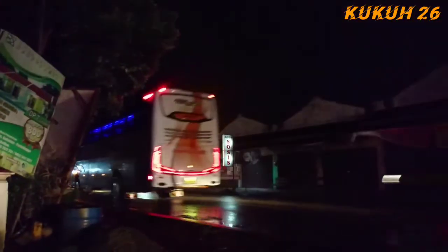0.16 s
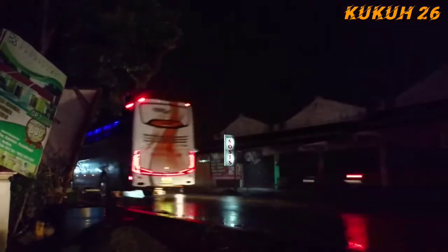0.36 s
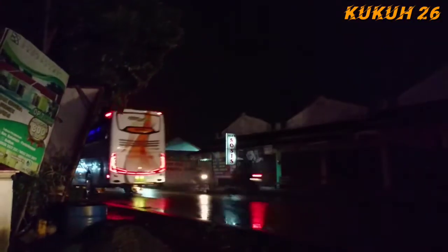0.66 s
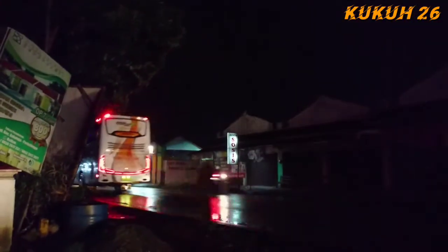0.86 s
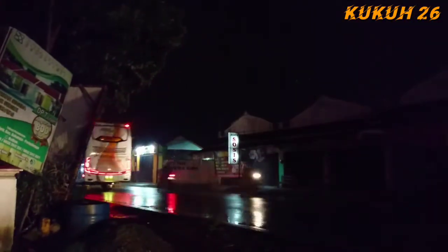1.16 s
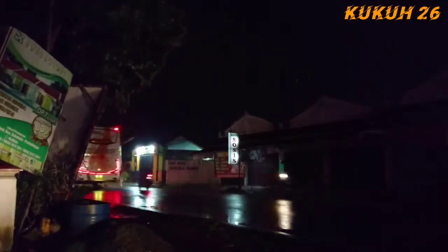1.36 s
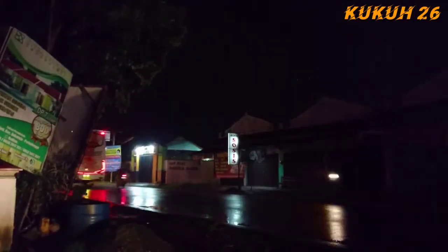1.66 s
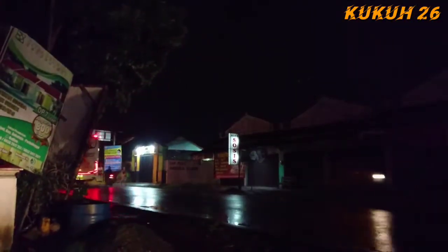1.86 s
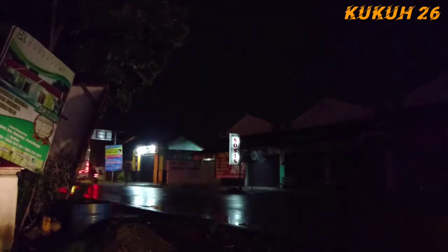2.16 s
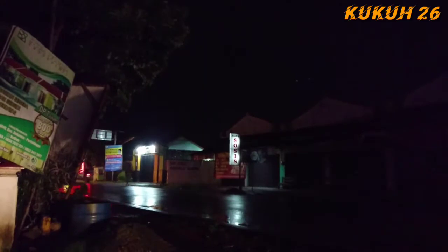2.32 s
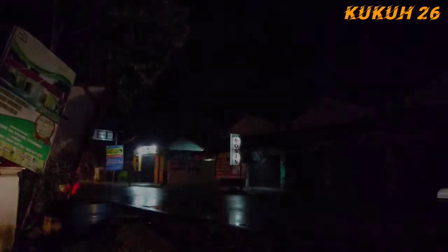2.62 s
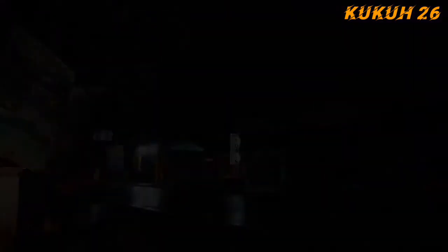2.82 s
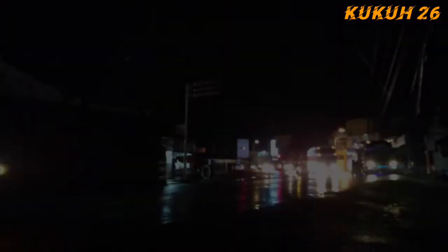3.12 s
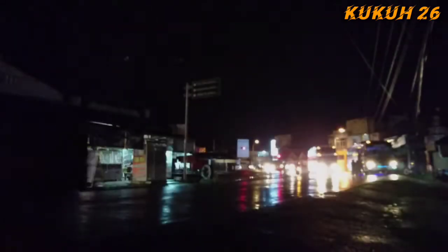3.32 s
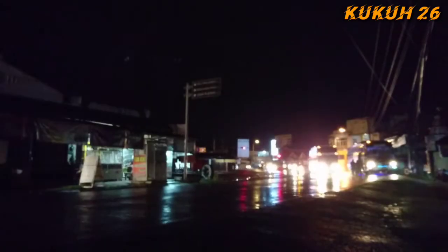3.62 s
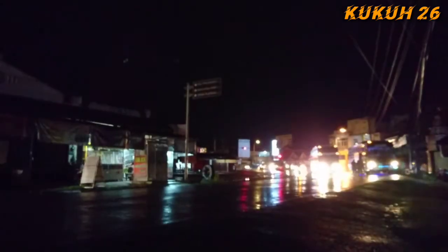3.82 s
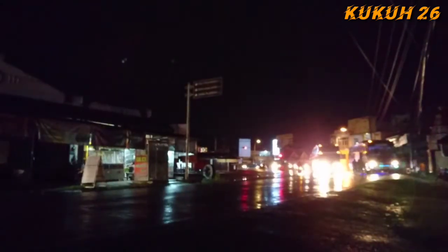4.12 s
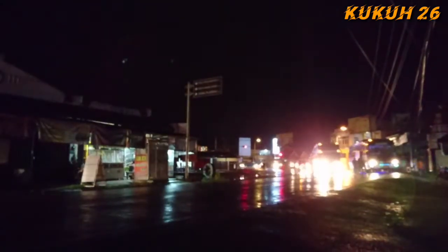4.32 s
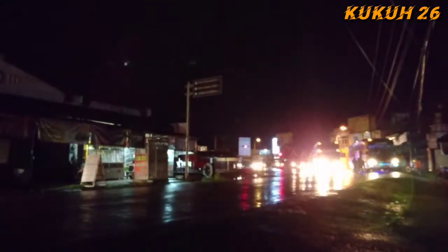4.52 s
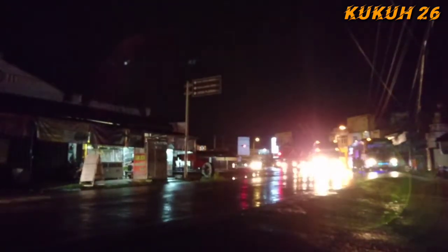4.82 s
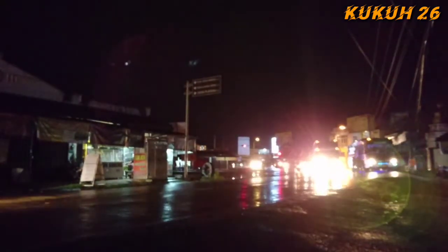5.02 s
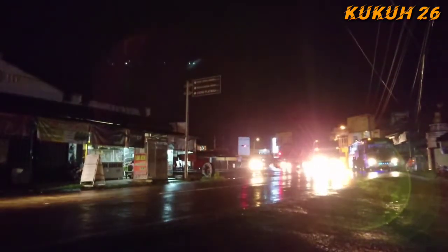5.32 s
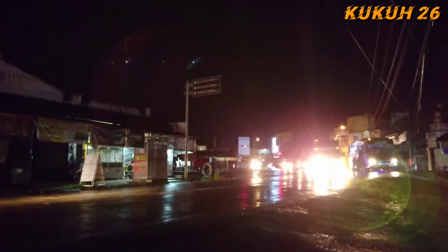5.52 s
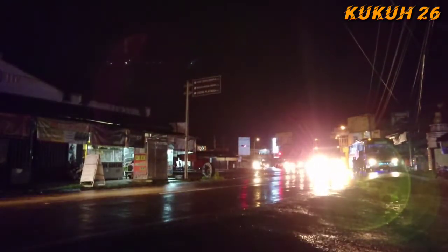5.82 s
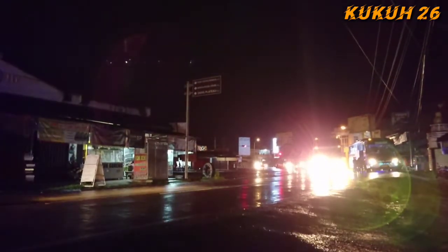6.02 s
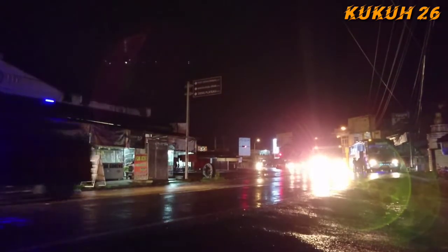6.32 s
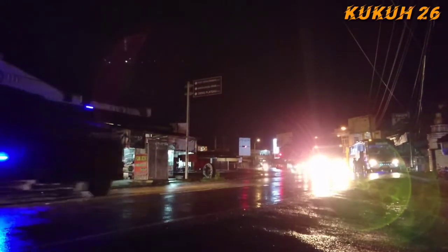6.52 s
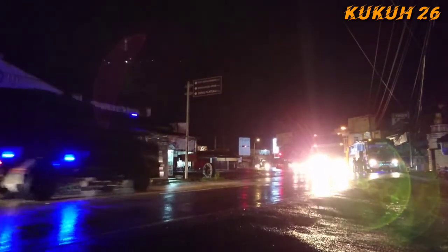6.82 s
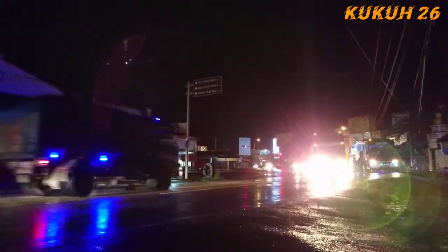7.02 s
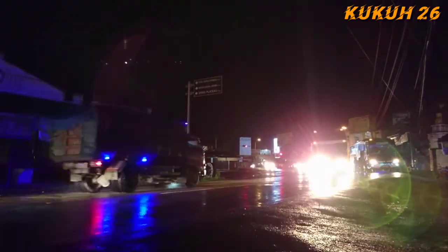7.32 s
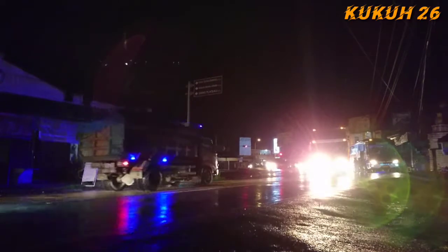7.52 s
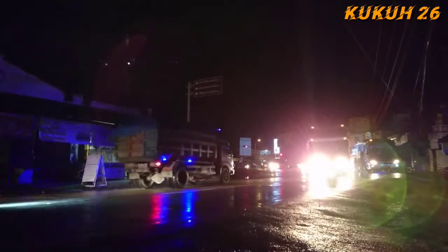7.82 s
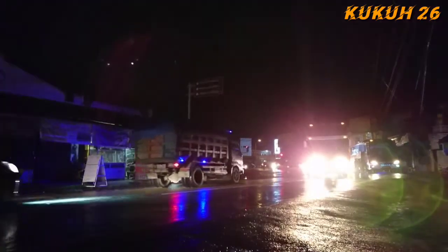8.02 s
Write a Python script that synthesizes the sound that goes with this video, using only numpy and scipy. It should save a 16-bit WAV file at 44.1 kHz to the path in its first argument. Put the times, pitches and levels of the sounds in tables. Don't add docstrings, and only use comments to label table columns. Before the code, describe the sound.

Night roadside on a wet street, phone microphone. From 0 s a nearby diesel coach pulls away, its hoarse intake howl near 900 Hz swelling around 0.15, 0.45 and 1 s over roar, injector clatter and fan hiss; it drops behind cover by about 1.2-1.7 s. A farther coach's buzzing exhaust growl strengthens from 0.6 s and climbs steadily to 2.4 s, then lifts off, with distant hums, wet tyre spray and a faint rising scooter whine. All fades from 2.45 to 3.05 s. Silence until 3.9 s, then abruptly a broad wet-road wash of slowing vehicles, treads singing thinly. Low lorry pulses slow in pitch, strongest near 4.5 and 5.1 s; hollow load bed booms build from 4.9 to 6.1 s. Splashes swell around 6-7 s, then faint idles and softening road hiss until 8.2 s. The left is dull first, almost silent later.

```python
import sys
import numpy as np
from scipy import signal
from scipy.fft import rfft, irfft, next_fast_len
from scipy.io import wavfile
from scipy.ndimage import uniform_filter1d

SR = 44100
rng = np.random.default_rng(int(sys.argv[2]) if len(sys.argv) > 2 else 0)


def elevation(decibels):
    levels = np.asarray(decibels, float)
    return 10 ** (levels / 20)


def int16_out(signal):
    q = np.round(np.clip(np.atleast_2d(signal).T, -1, 1) * 32767)
    wavfile.write(sys.argv[1], SR, q.astype(np.int16))


N = 360297
LONG = next_fast_len(N)
TIME, FREQ = np.arange(N) / SR, np.fft.rfftfreq(LONG, 1 / SR)


def columns(table):
    times, *values = np.transpose(table)
    return [np.interp(TIME, times, value) for value in values]


def over_hz(table):
    hz, value = np.transpose(table)
    return np.interp(np.log(FREQ + 1), np.log(hz), value)


def span(table, edge_s=0.099):
    inside_s = np.minimum(TIME - table[0][0], table[-1][0] - TIME)
    return np.clip(inside_s / edge_s + 1, 0, 1)


def bell(at_s, width_s):
    return np.exp(-((TIME - at_s) / width_s) ** 2)


def glides(rows):
    return [[(s, a_hz, db), (s + length, b_hz, db)] for s, length, a_hz, b_hz, db in rows]


def wave(spectrum):
    return irfft(spectrum, LONG)[..., :N]


def walk(rate):
    x = wave(rfft(rng.standard_normal(LONG)) * np.exp(-(FREQ / rate) ** 2))
    return x / x.std()


def tone(hz, db, rough, width_hz):
    wander = walk(width_hz) + 1j * walk(width_hz)
    waver = np.sqrt(1 - rough) + np.sqrt(rough / 2) * wander
    turning = np.exp(2j * np.pi * np.cumsum(hz) / SR)
    return np.sqrt(2) * elevation(db) * np.real(waver * turning)


def orders(table, multiples, roughs):
    hz, *order_db = columns(table)
    lines = sum(tone(k * hz, db, rough, 6) for k, db, rough in zip(multiples, order_db, roughs))
    return span(table, .12) * lines


def knock(hz, depth):
    gain = np.exp(depth * np.cos(2 * np.pi * np.cumsum(hz) / SR))
    return gain / np.sqrt(np.mean(gain ** 2))


def ports(x, other, left_db, lead, like):
    ratio = elevation(left_db)
    balance = 2 / np.sqrt(1 + ratio ** 2 + 2 * ratio * like)
    mixed = like * x + np.sqrt(1 - like ** 2) * other
    left = mixed * ratio * np.exp(1j * lead * np.arctan(FREQ / 90))
    return np.array([left, x]) * balance


# (frequency [Hz], correlation [-1 to 1])
PORT_LIKENESS = [(60, 0.77), (250, 0.96), (600, 0.5), (900, 0.75), (1300, -0.2), (1800, -0.14),
                 (2150, -0.43), (2500, 0.72), (3300, .02)]
# (frequency [Hz], width [Hz], level [dB])
PORT_PEAKS = [(1217, 69, -2.5), (1970, 100, 2), (2640, 170, 2), (3174, 580, -3.5), (4000, 150, 0),
              (4580, 350, 0.5), (6100, 500, -1), (7500, 600, 3.5), (12640, 540, -3), (14270, 1200, 0),
              (20, 28, -6)]


def wash(colour, left_db, lead, edges_hz, levels_db, flicker_db, rate):
    a, b = rfft(rng.standard_normal((2, LONG)))
    peaks_db = sum(db * np.exp(-((FREQ - hz) / width) ** 2) for hz, width, db in PORT_PEAKS)
    like = np.clip(over_hz(PORT_LIKENESS), -.99, .99)
    both = ports(a, b, left_db, lead, like) * elevation(over_hz(colour) + peaks_db)
    steps = [1] + [1 / (1 + (hz / (FREQ + 1)) ** 8) for hz in edges_hz[1:]] + [0]
    bands = []
    for k, db in enumerate(levels_db):
        part = both * (steps[k] - steps[k + 1])
        middle = part.mean(axis=0)[FREQ > edges_hz[0]]
        rms = np.sqrt(2 * np.sum(abs(middle) ** 2)) / LONG
        bands.append(wave(part) / rms * elevation(db + flicker_db * walk(rate)))
    return bands


def exhaust(table, order_db, rough, width_hz):
    hz = columns(table)[0]
    lines = sum(tone(k * hz, db, min(rough * k, 1), width_hz) for k, db in enumerate(order_db, 1))
    growl_db = np.max(order_db, axis=0) - 22
    for j, k in enumerate(range(len(order_db) + 1, 11)):
        lines = lines + tone(k * hz, growl_db - 2.3 * j, 0.49, 12)
    left = elevation(np.interp(TIME, (0.98, 1.2), (-1.5, -11.5)))
    return span(table) * lines * np.array([left, np.ones(N)]) * 2 / (1 + left)


# (time [s], half firing rate [Hz], firing level [dB])
FAR_COACH = [
    (0, 60.6, -35),
    (.4, 61.25, -32),
    (.6, 62.6, -23),
    (1.05, 66.8, -20.5),
    (1.65, 72.5, -22),
    (1.95, 76.1, -19),
    (2.4, 81.3, -20),
    (2.55, 81.05, -38),
    (3.04, 78.6, -48),
]


def far_coach():
    hz, db = columns(FAR_COACH)
    loudest_half_db, shut_half_db = -27, -61
    half_db = np.clip(loudest_half_db - 10.5 * (71.1 - hz), shut_half_db, loudest_half_db)
    order_db = [half_db, db]
    pipe_hz, pipe_width_hz, pipe_db = 285, 21, 6.5
    for k, under_db in ((3, -13), (4, -16)):
        lift_db = pipe_db * np.exp(-((k * hz - pipe_hz) / pipe_width_hz) ** 2)
        order_db.append(db + under_db + lift_db)
    ninth = tone(9 * hz, db - 17, .3, 8.8) * np.exp(-((9 * hz - 687) / 40) ** 2)
    return exhaust(FAR_COACH, order_db, .015, 6) + ninth


# (time [s], firing rate [Hz], firing level [dB])
NEAR_COACH = [
    (0, 103.9, -22),
    (.3, 106.2, -24.5),
    (.7, 113.1, -26.5),
    (1, 116.8, -22.5),
    (1.2, 118.2, -32),
    (1.4, 116.4, -49),
]


def near_coach():
    db = columns(NEAR_COACH)[1]
    return exhaust(NEAR_COACH, [db, db - 9], .03, 6)


# (time [s], pitch [Hz], level [dB])
HOWL = [
    (0, 900, -20),
    (.15, 920, -14),
    (.28, 938, -23.5),
    (.45, 928, -10.5),
    (.7, 919, -15),
    (.84, 937.7, -25),
    (1.0, 947.5, -17.5),
    (1.3, 919, -23),
    (1.68, 813, -38),
]
# (frequency [Hz], level [dB per Hz])
ENGINE_COLOUR = [(18, -59), (30, -38.5), (111, -9.5), (164, -23.5), (370, -7.5), (750, -5), (924, -4.5),
                 (1110, -8.5), (2630, -10.5), (7300, -25), (10000, -37), (15600, -24)]
# (frequency [Hz], level [dB])
DULL_LEFT = [(60, -11), (250, -5), (600, -3.5), (900, -4), (1800, -4.5), (2500, -7.5), (3500, -1.5),
             (4500, -6), (6000, -1), (6800, -10), (7050, -70.5), (8200, -68), (8500, -15), (14000, -22.5)]
# (level [dB], loss with distance [dB/s], cover reached [s], loss behind cover [dB/s])
ENGINE_LAYERS = [
    (-14.5, 3.5, 1.636, 120),
    (-17, 1.66, 1.183, 49),
    (-31.5, 3, 1.13, 71),
]


def near_engine_bay():
    howl_hz, howl_db = columns(HOWL)
    howl_hz = howl_hz * (1 + .016 * walk(6))
    levels_db = []
    for db, away, cover_s, hidden in ENGINE_LAYERS:
        levels_db.append(db - away * TIME - hidden * np.maximum(TIME - cover_s, 0))
    levels_db[0] = levels_db[0] - 3
    edges_hz = (150, 1200, 8500)
    roar, clatter, fan = wash(ENGINE_COLOUR, over_hz(DULL_LEFT), .2, edges_hz, levels_db, 0.86, 7.2)
    clatter = knock(columns(NEAR_COACH)[0], 0.058) * clatter
    shared = tone(howl_hz, howl_db, 0.8, 60)
    howl = [0.58 * shared + 0.67 * tone(howl_hz, howl_db, 0.95, 62) for _ in range(2)]
    return span(HOWL, 0.1) * np.array(howl) + roar + clatter + fan


# (time [s], firing rate [Hz], firing level [dB])
LORRY_REVS = [
    (3.9, 59.4, -46),
    (4.2, 59.3, -40),
    (4.47, 57.5, -27.5),
    (4.75, 56.6, -36.5),
    (5.1, 55.93, -29.5),
    (5.4, 53.78, -37),
    (5.8, 50.4, -35),
    (6.1, 48.74, -40),
    (6.6, 45.72, -43),
]
# (time [s], level [dB])
BED_BOOMS = [
    (4.3, -38),
    (4.87, -33),
    (5.12, -29),
    (5.42, -26),
    (5.77, -26),
    (6.099, -27),
    (6.42, -37),
]


def lorry():
    hz, db = columns(LORRY_REVS)
    boom = elevation(-41) + sum(elevation(boom_db) * bell(s, 0.11) for s, boom_db in BED_BOOMS)
    low = tone(hz, db, .03, 6) + tone(2 * hz, -39, .2, 6)
    bed = tone(7 * hz, 0, .4, 18) + tone(8 * hz, -8, .5, 12) + tone(8.1 * hz, -4, 0.81, 37)
    return span(LORRY_REVS, 0.13) * (low + boom * bed)


# (time [s], firing rate [Hz], level [dB])
VAN_REVS = [
    (3.9, 77.8, -34.5),
    (4.35, 76, -38),
    (4.7, 75, -59),
    (6.2, 69.1, -36),
    (6.5, 69, -50),
]


def van():
    table = [(s, hz, db, db - 7.5) for s, hz, db in VAN_REVS]
    return orders(table, (1, 2), (.05, .3))


# (start [s], length [s], first pitch [Hz], last pitch [Hz], level [dB])
IDLING = [
    (6.5, .33, 91, 90.5, -33),
    (7, 1.2, 98, 91, -41),
    (7, 1.2, 63, 59, -39),
    (7.5, .5, 140, 137, -41),
    (7.45, .45, 183, 185, -38),
]


def idlers():
    return sum(orders(table, [1], [.12]) for table in glides(IDLING))


def tread_song(rows, share_db, width_hz):
    song = 0
    for table in glides(rows):
        hz, db = columns(table)
        song = song + span(table, 0.2) * tone(hz, db + share_db, 0.91, width_hz)
    return song


# (start [s], length [s], first pitch [Hz], last pitch [Hz], level [dB])
QUEUE_TREADS = [
    (3.9, 0.303, 1834, 1853, -18),
    (4.6, .8, 1913, 1814, -19),
    (5.6, .6, 1804, 1800, -27),
    (6.45, .2, 1728, 1694, -21),
    (6.75, .3, 1750, 1700, -23),
    (7.1, 1.1, 1711, 1783, -27.5),
    (3.9, 1.6, 2820, 2830, -24),
    (6.6, 1.6, 4750, 4605, -30),
]


def queue_treads():
    return tread_song(QUEUE_TREADS, -10.5, 330)


# (start [s], length [s], first pitch [Hz], last pitch [Hz], level [dB])
SCOOTER_WHINE = [
    (2.35, .35, 2400, 2484, -31),
]


def scooter():
    return tread_song(SCOOTER_WHINE, -4.5, 316)


# (start [s], length [s], first pitch [Hz], last pitch [Hz], level [dB])
STREET_HUMS = [
    (1.9, 1.2, 206, 200, -42),
    (2.4, .7, 55.5, 56.5, -37),
    (1.75, 1.3, 412, 397, -36),
    (2.45, .4, 155, 152, -27),
]


def distant_engines():
    return sum(orders(table, [1], [.4]) for table in glides(STREET_HUMS))


# (frequency [Hz], level [dB per Hz])
STREET_COLOUR = [(18, -52.5), (30, -24), (71, -11.5), (113, -13.5), (158, -7.5), (281, -12.5), (394, -18.5),
                 (485, -15), (552, -13), (1110, -18), (7240, -30), (9150, -45.5), (15000, -39)]
# (level [dB], rise as a vehicle nears [dB])
STREET_LAYERS = [
    (-28.5, 2.5),
    (-27, -1),
    (-35, 7),
    (-64, 18),
]


def street_road(left_db):
    nearness = np.interp(TIME, (1.76, 2.65), (0, 1))
    levels_db = [db + rise * nearness for db, rise in STREET_LAYERS]
    edges_hz = (30, 500, 3000, 11500)
    rumble, tyres, spray, mist = wash(STREET_COLOUR, left_db, 0.058, edges_hz, levels_db, 0.69, 11)
    return rumble + tyres + knock(columns(FAR_COACH)[0], .07) * (spray + mist)


# (time [s], level [dB])
QUEUE_LEVEL = [
    (3.9, 0.3),
    (4.15, .5),
    (4.4, -1),
    (4.8, 0),
    (5.2, -0.5),
    (5.75, -0.5),
    (6.05, -1.5),
    (6.55, -1.5),
    (7.2, -3),
    (8.17, -4.5),
]
# (frequency [Hz], level [dB per Hz])
EARLY_QUEUE_COLOUR = [(18, -35), (30, -24.5), (59, -6.5), (88, -14), (114, -13), (219, -9.5), (380, -4.5),
                      (577, -8.5), (1230, -6.5), (1970, -9), (3600, -13), (7300, -12.5), (9000, -25),
                      (15600, -26)]
# (frequency [Hz], level [dB per Hz])
LATE_QUEUE_COLOUR = [(18, -38), (30, -10), (55, -5.5), (219, -6.5), (300, -1), (468, -6), (577, -11),
                     (877, -6.5), (1270, -10), (1520, -8.5), (2560, -12), (7300, -15.5), (8770, -27.5),
                     (15600, -32.5)]
# (level [dB], share of queue level [ratio], share of splash [ratio])
WET_LAYERS = [
    (-27, 0.61, 0.14),
    (-23.5, 1.64, 0.035),
    (-28, 0.9, 1.24),
    (-53, 0.88, .8),
]
# (time [s], width [s], swell [dB])
PUDDLES = [
    (4.25, 0.14, -0.3),
    (4.78, 0.19, 1),
    (5.72, 0.093, 0),
    (6.1, 0.54, 1),
    (6.35, 0.14, 1.5),
    (6.85, .15, 1.5),
    (7.82, .08, 0.5),
]


def queue_road(left_db):
    splash_db = sum(db * bell(s, width_s) for s, width_s, db in PUDDLES)
    queue_db = columns(QUEUE_LEVEL)[0]
    levels_db = [db + away * queue_db + wet * splash_db for db, away, wet in WET_LAYERS]
    edges_hz = (150, 600, 3000, 11000)
    early = sum(wash(EARLY_QUEUE_COLOUR, left_db, -.9, edges_hz, levels_db, 0.42, 30))
    late = sum(wash(LATE_QUEUE_COLOUR, left_db, -.9, edges_hz, levels_db, 0.42, 30))
    turn = np.interp(TIME, (5.56, 7.26), (0, np.pi / 2))
    return (early * np.cos(turn) + late * np.sin(turn)) * knock(columns(VAN_REVS)[0], 0.072)


def first_take():
    left_db = over_hz(DULL_LEFT) - 3 + 2.5 / (1 + (FREQ / 250) ** 2)
    far = wave(ports(rfft(distant_engines() + scooter(), LONG), 0, left_db, 0.101, 0.84))
    mix = far_coach() + near_coach() + near_engine_bay() + far + street_road(left_db)
    return mix * np.interp(TIME, (2.453, 3.049), (1, 0))


# (frequency [Hz], level [dB])
BLOCKED_LEFT = [(60, -11.5), (120, -17), (250, -31), (400, -37), (700, -35), (1000, -46), (1300, -44),
                (2000, -57), (4000, -62), (6000, -75)]


def second_take():
    left_db = over_hz(BLOCKED_LEFT)
    lines = lorry() + van() + idlers() + queue_treads()
    return wave(ports(rfft(lines, LONG), 0, left_db, -1.2, 1.0)) + queue_road(left_db)


def scene():
    return first_take() * (TIME < 3.04) + second_take() * (TIME > 3.8937)


# (time [s], top [Hz])
TREBLE_TOP = [(0, 15600), (1.26, 15300), (1.3, 12700), (1.8, 13700), (2.35, 14500), (2.6, 15000),
              (3.9, 15500)]


def thin_treble(x):
    hz, s, cells = signal.stft(x, SR, nperseg=2048)
    hz = hz[:, None]
    group = uniform_filter1d(abs(cells) ** 2, size=11, axis=1)
    usual = uniform_filter1d(uniform_filter1d(group, size=60, axis=1), size=9, axis=2)
    # share of the neighbours' power, and level under the whole sound [dB]
    share, under_db = np.array([[[1.1]], [[.68]]]), np.array([[[-50]], [[-31]]])
    whole = group.mean(axis=1, keepdims=True).max(axis=0) * elevation(under_db) ** 2
    beside = share * np.clip((hz - 7500) / 3500, 0, 1) * usual
    bar = np.maximum(beside, whole * (hz > 7000))
    bar[0, (hz[:, 0] > 7000) & (hz[:, 0] < 8300)] = np.inf
    top_hz = np.interp(s, *np.transpose(TREBLE_TOP)) - 350 * np.floor(rng.exponential(.7, len(s)))
    kept = cells * (group > bar) * (hz < top_hz)
    return signal.istft(kept, SR, nperseg=2048)[1][:, :N]


def low_pass(x):
    return signal.sosfilt(signal.butter(12, 16050, fs=SR, output="sos"), x)


def record(dry):
    peak = .95
    held = peak * np.tanh(dry / peak)
    mix = thin_treble(held)
    return low_pass(mix)


dry = scene()
out = record(dry)
int16_out(out)
```